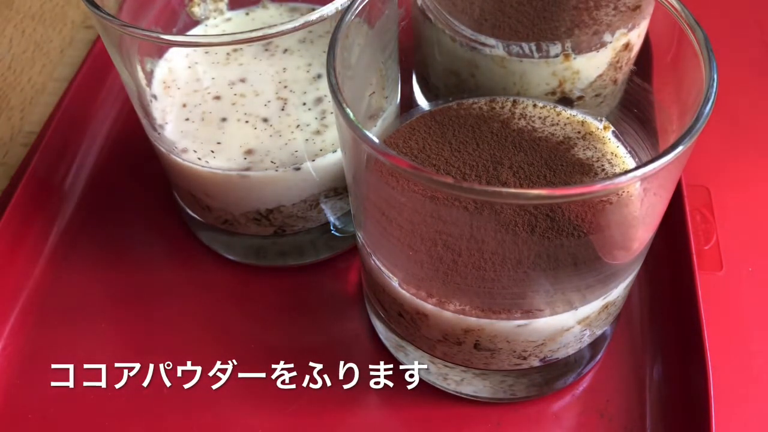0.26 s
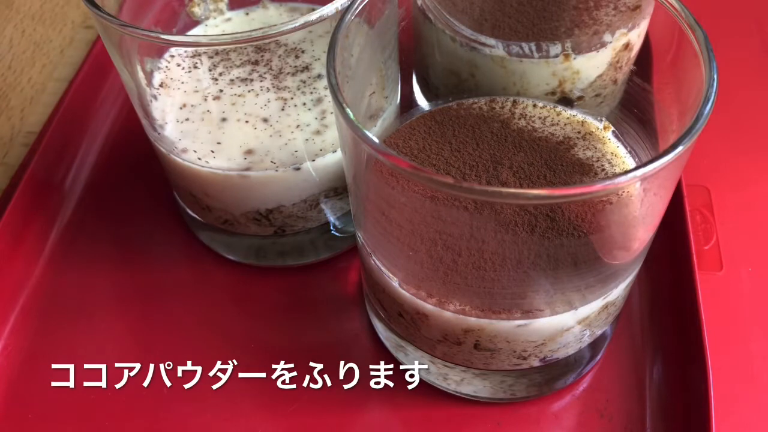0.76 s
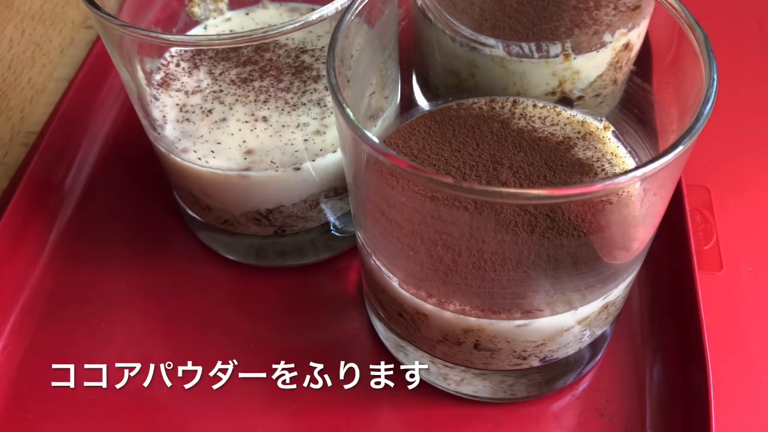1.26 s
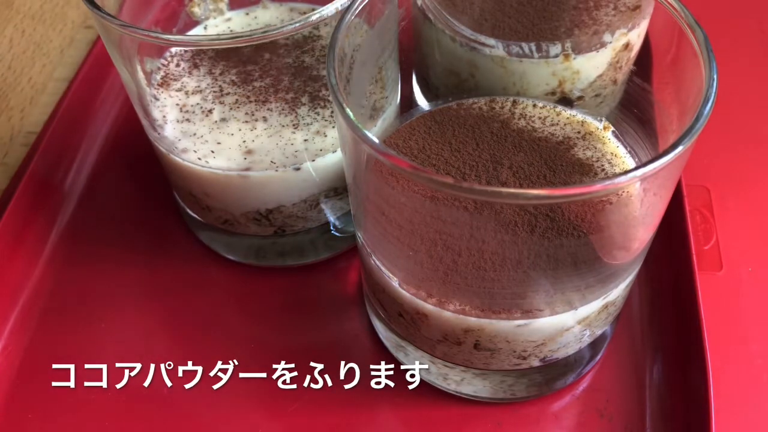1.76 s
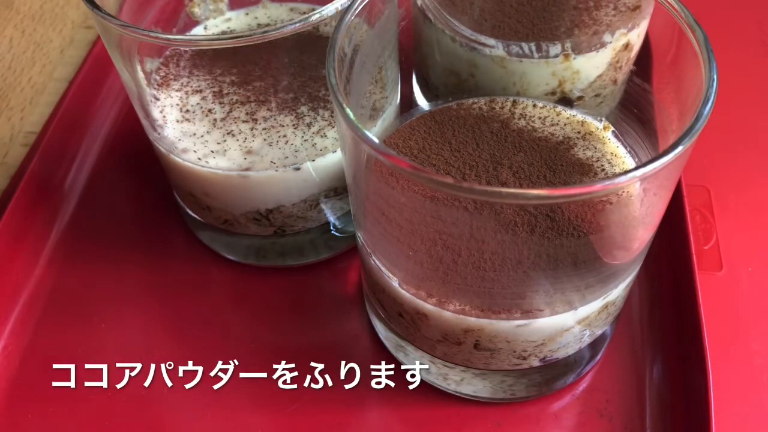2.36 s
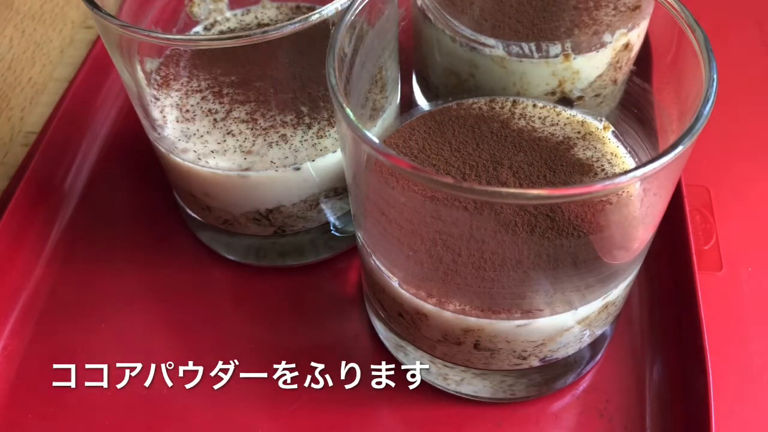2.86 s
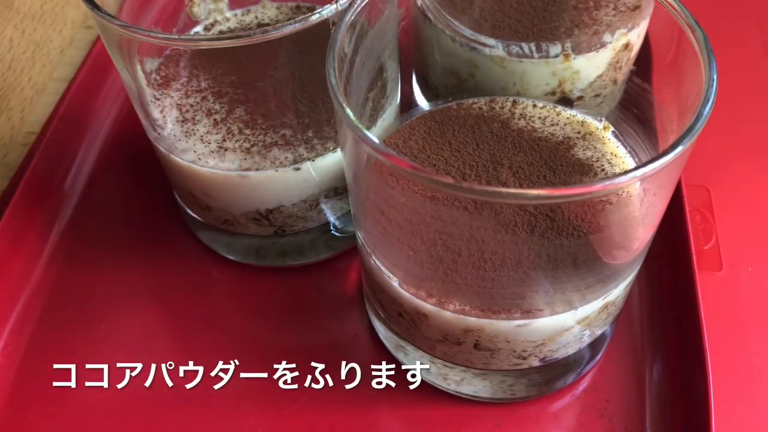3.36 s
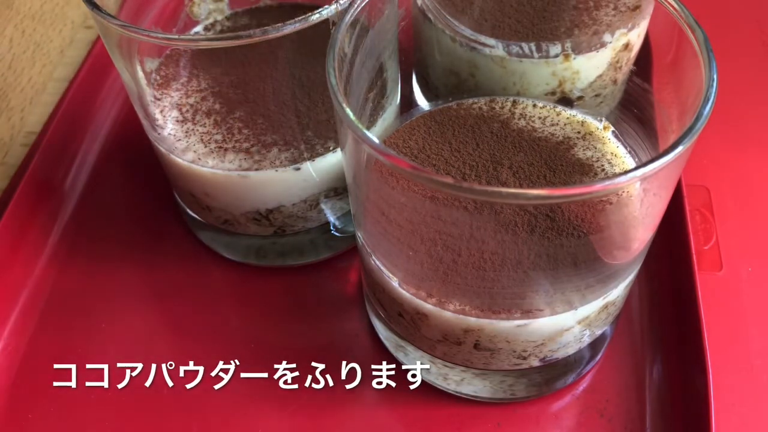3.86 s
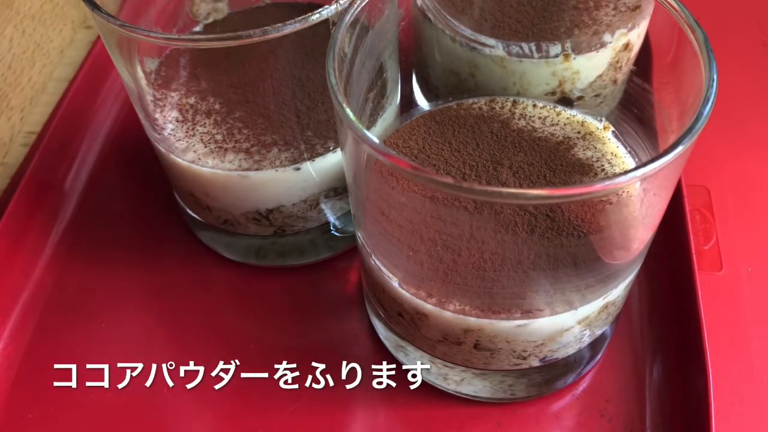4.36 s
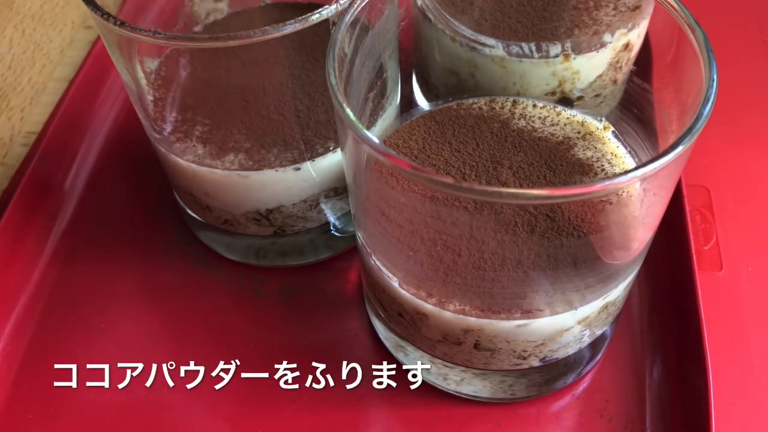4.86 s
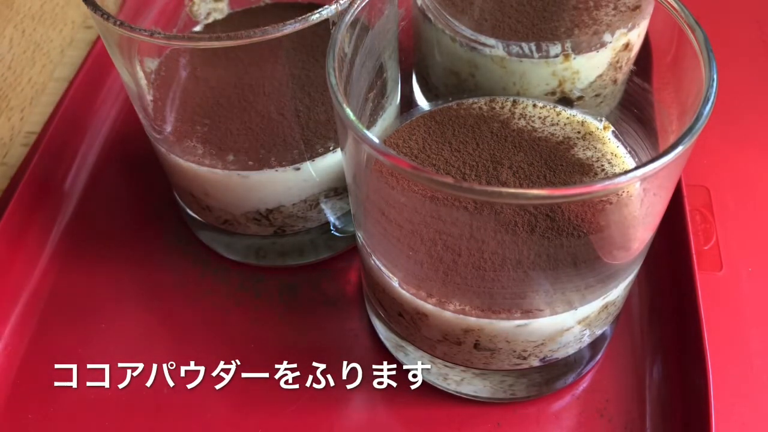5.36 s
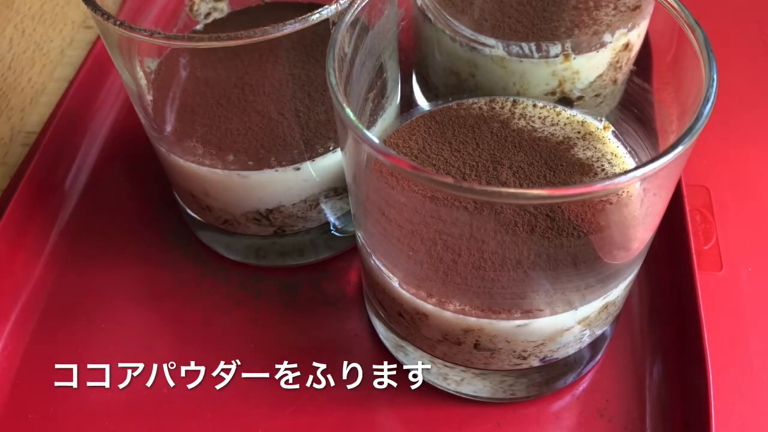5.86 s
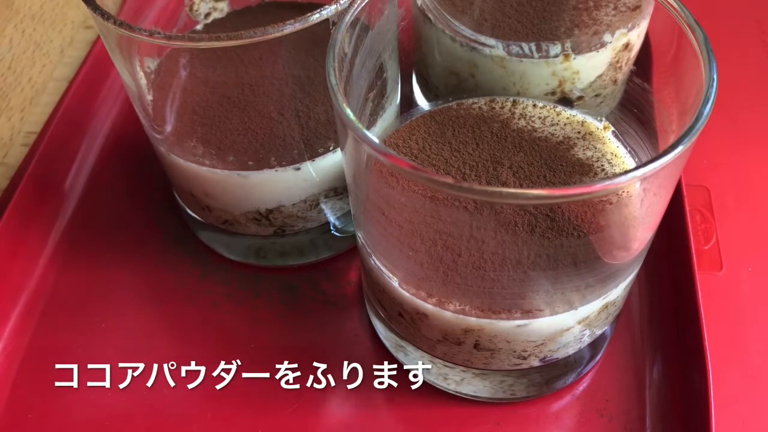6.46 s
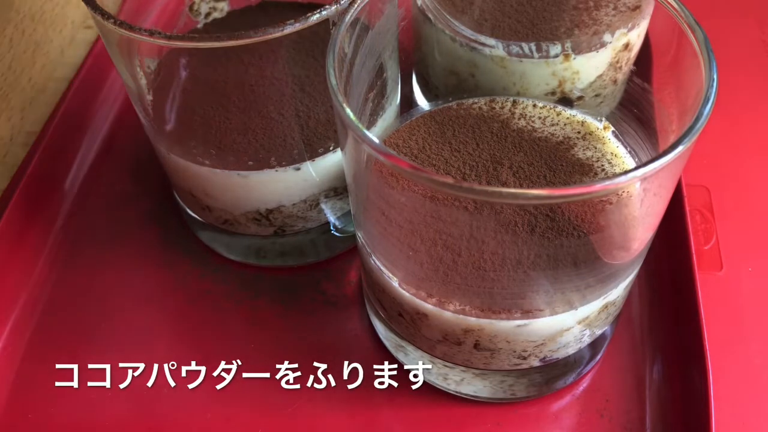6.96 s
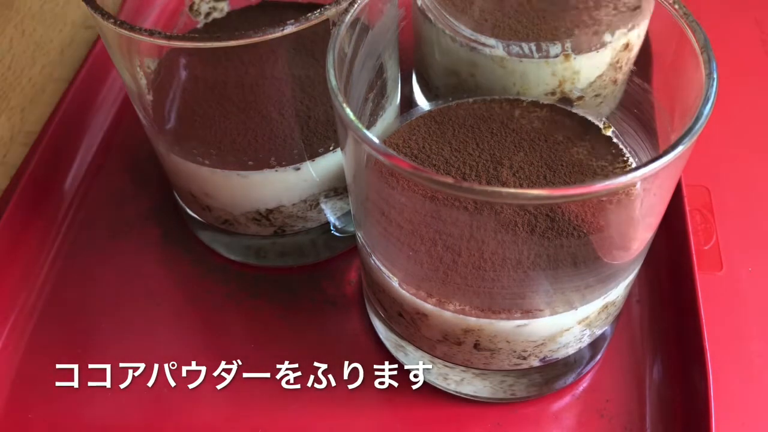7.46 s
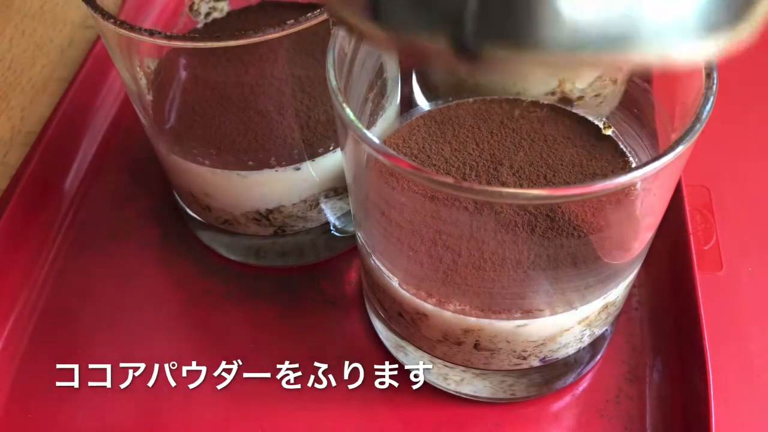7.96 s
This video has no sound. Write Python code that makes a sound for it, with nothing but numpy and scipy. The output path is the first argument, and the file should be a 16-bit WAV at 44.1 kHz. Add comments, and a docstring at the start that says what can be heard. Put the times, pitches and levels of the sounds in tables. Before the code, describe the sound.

A small metal sieve is tapped quickly and evenly, making close, crisp clicks with soft hollow thuds in a quiet kitchen.

```python
"""Quick metallic taps, about five and a half a second: a small sieve dusts cocoa over desserts. Each impact is
a few milliseconds of metal chatter, with a low thud that sinks in pitch, low resonances that swell and die, and
a faint ring of rim and handle; a kitchen answers with a short echo. The sieve ticks lightly between taps, and a
thin tone glides by twice over the murmur of the room's air. The microphone is close, and the hardest taps
overload it softly."""
import sys
import numpy as np
from scipy import signal
from scipy.fft import rfft, irfft, next_fast_len
from scipy.io import wavfile
from scipy.ndimage import uniform_filter1d

SR = 44100
rng = np.random.default_rng(int(sys.argv[2]) if len(sys.argv) > 2 else 0)


def generate_wav(signal):
    """Clip the signal to [-1, 1] and save it as 16-bit WAV at the path in sys.argv[1]."""
    frames = np.transpose(np.atleast_2d(signal))
    scaled = np.clip(frames, -1, 1) * 32767
    pcm = np.round(scaled).astype(np.int16)
    wavfile.write(sys.argv[1], SR, pcm)


N = 362502

# Blows on the sieve. Each row: start in seconds, chatter length in seconds, favoured resonance (the bite) in
# Hz, then relative levels of click, thud and low resonances in dB.
TAPS = [(0.053, 0.0086, 8300, -37, -39.5, -44), (0.222, 0.00067, 9150, -28, -35.5, -35),
        (0.3916, 0.0059, 9900, -22.5, -31, -36), (0.5631, 0.0017, 5670, -21.5, -31.5, -28.5),
        (0.74, 0.0071, 6960, -21.5, -28, -28), (0.9258, 0.005, 6630, -16.5, -27, -30.5),
        (1.105, 0.0056, 6360, -16, -29, -36), (1.286, 0.0073, 6300, -17.5, -29, -28),
        (1.465, 0.0037, 6300, -18, -27.5, -29.5), (1.642, 0.0027, 7140, -11.5, -24.5, -21.5),
        (1.822, 0.0047, 6750, -13.5, -26, -27.5), (2.0041, 0.0027, 9400, -15.5, -24.5, -30),
        (2.1816, 0.0042, 5860, -11, -25.0, -27), (2.3602, 0.0028, 5300, -9, -26, -26.0),
        (2.5457, 0.0068, 5300, -8.0, -25.5, -21.5), (2.7356, 0.0023, 7650, -10.5, -23, -16.5),
        (2.9162, 0.0043, 6900, -10.5, -21.5, -18), (3.0943, 0.0091, 5470, -11.5, -25.5, -26.5),
        (3.2755, 0.014, 9000, -19.0, -29, -25.0), (3.4646, 0.013, 4900, -22.5, -30, -25.5),
        (3.6431, 0.013, 6200, -21.5, -29.5, -24.5), (3.824, 0.016, 3320, -22.5, -34, -26),
        (4.009, 0.0069, 9060, -24.5, -29.5, -26), (4.1937, 0.0062, 5330, -18, -28, -27),
        (4.369, 0.0086, 5400, -18.5, -28.5, -30), (4.5461, 0.0044, 7100, -21, -23.5, -23.5),
        (4.7225, 0.0066, 6370, -18, -26.5, -24.5), (4.9022, 0.0015, 6150, -15, -24, -23),
        (5.0787, 0.0036, 5270, -12, -23, -22.5), (5.2516, 0.0072, 5270, -19, -28.5, -26),
        (5.437, 0.0041, 6000, -22.5, -30.5, -32), (5.6242, 0.0019, 5700, -21.5, -28.5, -31.5),
        (5.808, 0.015, 4900, -20, -31.5, -28.5), (5.9923, 0.008, 4150, -18, -27.5, -33.5),
        (6.175, 0.0036, 3800, -19.0, -28, -32), (6.3524, 0.0069, 2720, -22, -24.5, -48.0),
        (6.53, 0.0057, 3160, -24, -25, -34.5), (6.7415, 0.003, 2860, -34.5, -38.0, -33.5),
        (6.911, 0.016, 3400, -24.0, -31, -27), (7.083, 0.0031, 6040, -21.5, -24.0, -30.5),
        (7.2669, 0.0048, 5740, -18.5, -23, -26), (7.4454, 0.0046, 8650, -23.5, -24.5, -28.5),
        (7.6282, 0.0013, 5900, -21, -24.5, -33.5), (7.802, 0.0059, 6700, -25.0, -27.5, -34.5),
        (7.9786, 0.0023, 5650, -19, -23, -22.5), (8.1482, 0.002, 4800, -21, -26, -30)]
# The clearest ticks between taps. Each row: start in seconds, peak level in dB, centre in Hz.
TICKS = [(4.2394, -31, 4660), (4.6, -39, 5160), (4.78, -34, 3657), (6.4882, -35.5, 4530),
         (6.9394, -32, 5280), (6.984, -30.5, 3250), (7.0403, -30.5, 2580)]
# Chatter bands: knock, clack, click, fizz. Each row: low edge in Hz, high edge in Hz, trim in dB.
REGISTERS = [(380, 1406, -1.5), (1960, 3810, -.5), (4130, 7030, -0.5), (7620, 15300, 0)]
# Low resonances set off by each blow. Each row: frequency in Hz, relative level in dB, t60 and rise in seconds.
LOW_MODES = [(50.5, -19, 0.27, 0.013), (99.8, -9.5, 0.28, 0.034), (169.3, -14, 0.25, 0.019),
             (215.9, 6.5, 0.087, 0.0068), (244, -4.5, 0.27, 0.041), (301.5, 2.5, 0.098, 0.0041),
             (336, -17.5, 0.41, 0.036), (382.2, -8, 0.13, 0.0036), (461, -3.5, 0.062, 0.008),
             (555, -36, 0.041, 0.004)]
# Modes of handle and rim. Each row: frequency in Hz, relative level in dB, t60 in seconds.
HANDLE_MODES = [(1946, 10, .55)]
RIM_MODES = [(3640, 11.5, 0.16), (3650, 8.5, 0.27), (4570, -18, 0.27), (5200, 4, 0.12), (5260, 6, 0.18),
             (6700, -14, .15)]
# The handle's ring comes and goes over several taps. Each row: time in seconds, gain in dB.
HANDLE_GAIN = [(0, -76), (.5, -60), (1.3, -65), (1.7, -56), (2.36, -62), (2.75, -48), (3.09, -55),
               (3.28, -49), (3.6, -64), (4.9, -61), (5.6, -68), (6.17, -54.5), (6.6, -74), (7.3, -58),
               (7.75, -66), (8.0, -52.5)]
# The rim's threshold. In order, all in dB: soft and hard gain re the click, threshold, its width.
RIM_THRESHOLD = (-41, -34.5, -16.5, 0.5)
# How three bands and the echo follow a blow. Each rule: base level in dB, dB per dB of click,
# dB per dB of thud, dB per octave duller, dB per octave brighter, dB per doubling of length.
KNOCK_RULE = (-27.5, 0.0743, 1.0, 3.5, 1.5, 1.2)
CLACK_RULE = (-26.5, 0.43, 0.92, 6, 4.5, 0.7)
FIZZ_RULE = (-22, 0.75, 0.11, -4.5, 5.5, 1.0)
ECHO_RULE = (-47.5, 0.735, 0.14, 2.5, 2.5, .5)
# Spectrum of the kitchen's echo. Each row: frequency in Hz, relative level in dB.
ECHO_COLOUR = [(200, 4), (600, 2), (1200, -1), (2400, -6), (4000, -2.5), (5400, -1), (7500, -3.5),
               (10000, -5.5), (15500, -7)]
# Reverberation time of the kitchen. Each row: frequency in Hz, t60 in seconds.
ECHO_T60 = [(200, 0.63), (1000, 0.31), (3000, 0.42), (5500, 0.37), (9000, 0.29), (16000, 0.26)]
# Glides of the thin tone. Each row: start and length in seconds, first pitch, last pitch and
# height of the arch in Hz, relative level in dB.
GLIDES = [(2.98, 0.16, 2220, 2930, 40, -50), (3.331, .6, 1890, 1947, 250, -51.5)]
# Spectrum of the steady background. Each row: frequency in Hz, relative density in dB.
AIR_SPECTRUM = [(18, -36), (30, -8), (85, 1), (140, 0), (230, 0), (546, -13.5), (639, -13.5), (1260, -13.5),
                (1510, -18), (1970, -19.5), (2240, -23.5), (5450, -24.5), (7460, -25.5), (15500, -30)]

# The ordinary tap, against which harder, heavier, brighter or longer ones are reckoned.
USUAL_CLICK_DB, USUAL_THUD_DB, USUAL_BITE_HZ, USUAL_LENGTH_S = -19, -27, 5700, .005


def sieve():
    """Impact excitation: each blow drives chatter, thud, modes and echo, coloured by how it lands."""
    out = np.zeros(N)
    usual_colour_db = np.array([KNOCK_RULE[0], CLACK_RULE[0], USUAL_CLICK_DB, FIZZ_RULE[0]])
    usual_colour_db -= USUAL_CLICK_DB
    for start, length, bite_hz, click_db, thud_db, low_modes_db in TAPS:
        hard, heavy = click_db - USUAL_CLICK_DB, thud_db - USUAL_THUD_DB
        octaves = np.log2(bite_hz / USUAL_BITE_HZ)
        dull, bright = max(-octaves, 0), max(octaves, 0)
        long = np.log2(length / USUAL_LENGTH_S)
        knock_db, clack_db, fizz_db, echo_db = (
            rule[0] + np.dot(rule[1:], (hard, heavy, dull, bright, long))
            for rule in (KNOCK_RULE, CLACK_RULE, FIZZ_RULE, ECHO_RULE))
        levels_db = np.array([knock_db, clack_db, click_db, fizz_db])
        handle_db = np.interp(start, *np.transpose(HANDLE_GAIN))
        handle_grip_db, rim_grip_db = 3 * rng.standard_normal(2)  # the hand's grip varies
        lead_s = .0033
        add(out, start - lead_s, graze(lead_s))
        add(out, start - .0003, chatter(length, bite_hz, levels_db + .5))
        add(out, start, amp(echo_db) * kitchen(levels_db - click_db - usual_colour_db, bite_hz))
        add(out, start, amp(thud_db + 3.5) * thud())
        add(out, start, amp(low_modes_db + 4) * low_modes())
        add(out, start, amp(handle_db + handle_grip_db) * ring(HANDLE_MODES))
        add(out, start, amp(rim_gain_db(click_db) + rim_grip_db) * ring(RIM_MODES))
    return out


def chatter(length, bite_hz, levels_db, bite_width_hz=600, spiky_db=4.3, rise_s=.00019, decay_s=.002):
    """Contact noise: metal rattles on metal in a dense, uneven run that dies within milliseconds."""
    t = seconds(.04)
    hold_s = length * .58
    envelope = np.minimum(t / rise_s, 1) * np.exp(-np.maximum(t - hold_s, 0) / decay_s)
    scatter = amp(-21) * np.exp(-t / .011) * (t > hold_s)  # returned by the tray and glasses
    contacts = np.interp(t, np.linspace(0, t[-1], num=80), rng.standard_normal(80))
    force = rng.standard_normal(len(t)) * (envelope + scatter) * amp(spiky_db * contacts)
    # The spot that is struck favours one broad resonance of the frame.
    resonance = signal.iirpeak(bite_hz, bite_hz / bite_width_hz, fs=SR)
    force += amp(6) * signal.lfilter(*resonance, force)
    out = np.zeros(len(t))
    for (low_hz, high_hz, trim_db), db in zip(REGISTERS, levels_db):
        part = band(force, low_hz, high_hz)
        out += amp(db + trim_db) * part / np.linalg.norm(part)
    return out * np.sqrt(.005 * SR)  # unit energy becomes unit rms over five milliseconds


def graze(length):
    """Light contact: a faint hiss grows just before the blow seats."""
    t = seconds(length)
    noise = rng.standard_normal(SR // 100)[:len(t)]
    hiss = band(noise * np.sqrt(t / length), 2000, 15000)
    return amp(-45 + 4 * rng.standard_normal()) * unit_rms(hiss)


def thud(start_hz=632, rest_hz=74, halving_s=.003226, attack_s=.003, hold_s=.03, release_db_per_s=2400):
    """Dispersion: the higher parts of the blow's low push arrive first, so the pitch sinks."""
    t = seconds(.05)
    detune = 1 + .059 * rng.standard_normal()
    hz = np.maximum(start_hz / (1 + t / halving_s), rest_hz) * detune
    attack = np.minimum(t / attack_s, 1) ** 4
    release = amp(-release_db_per_s * np.maximum(t - hold_s, 0))
    return attack * release * np.sin(2 * np.pi * np.cumsum(hz) / SR)


def low_modes(detune=.016, uneven_db=2):
    """Resonance: low modes swell and die, a little differently at each blow."""
    draws = rng.standard_normal((len(LOW_MODES), 2))
    return sum(mode(hz * (1 + detune * sharp), db + uneven_db * loud, t60, rise, width_hz=12, blur_s=.097)
               for (hz, db, t60, rise), (sharp, loud) in zip(LOW_MODES, draws))


def ring(modes):
    """Damped free vibration: thin metal, held in the hand, rings at its natural frequencies."""
    return sum(mode(hz, db + uneven_db, t60, rise_s=.0011, width_hz=24, blur_s=.08)
               for (hz, db, t60), uneven_db in zip(modes, rng.standard_normal(len(modes))))


def rim_gain_db(click_db):
    """Threshold response: the rim barely sounds until the click is strong enough, then rings out."""
    soft_db, hard_db, threshold_db, width_db = RIM_THRESHOLD
    return click_db + soft_db + (hard_db - soft_db) / (1 + np.exp((threshold_db - click_db) / width_db))


def mode(hz, db, t60, rise_s, width_hz, blur_s):
    """Interference: a decaying tone starts clean, then reflections make its level and phase uneven."""
    t, slow = seconds(.25), np.linspace(0, .25, num=250)
    onset = 1 - np.exp(-(slow / rise_s) ** 2)
    fade = np.minimum((slow[-1] - slow) / .05, 1)
    level = amp(db - 60 * slow / t60) * onset * fade
    direct = np.exp(-slow / blur_s)
    reflected = np.sqrt(1 - direct ** 2) * wander(slow, width_hz)
    envelope = level * (direct + reflected)
    phase = 2 * np.pi * hz * t + np.interp(t, slow, np.unwrap(np.angle(envelope)))
    return np.interp(t, slow, abs(envelope)) * np.sin(phase)


def ticks(decay_s=.0029):
    """Small impacts: the sieve shifts in the hand, giving short noise bursts with a faint echo."""
    out, t = np.zeros(N), seconds(.02)
    for start, db, hz in list(TICKS) + list(rebounds()):
        burst = rng.standard_normal(len(t)) * np.exp(-t / decay_s)
        tick = band(burst, hz * .54, hz * 1.77)
        add(out, start, amp(db) * tick / abs(tick).max())
        add(out, start, amp(db - 36) * kitchen(np.zeros(len(REGISTERS)), hz))
    return out


def rebounds(chance=.22, earliest_s=.055, latest_s=.11, level_db=-41, centre_hz=5600):
    """Rebound: after some taps the sieve lifts and ticks faintly. Yields rows like those of TICKS."""
    uniform, normal = rng.random((len(TAPS), 2)), rng.standard_normal((len(TAPS), 2))
    for (start, *_), (luck, when), (loud, sharp) in zip(TAPS, uniform, normal):
        if luck < chance:
            delay = earliest_s + (latest_s - earliest_s) * when
            yield start + delay, level_db + 3 * loud, centre_hz * 2 ** (.3 * sharp)


def kitchen(tap_colour_db, bite_hz, follow=.37, bite_db=3, bite_octaves=.2, build_s=.00031):
    """Diffuse reverberation: the echo takes on part of the tap's colour, and its bass lasts longest."""
    hz, t, spectrum = signal.stft(rng.standard_normal(SR // 3), SR, nperseg=256)
    centres = [np.sqrt(low * high) for low, high, _ in REGISTERS]
    tap_db = curve_at(list(zip(centres, tap_colour_db)), hz)
    # Each blow favours other partials.
    partials = unit_rms(uniform_filter1d(rng.standard_normal(len(hz)), size=3))
    bite = np.exp(-(np.log2((hz + 1) / bite_hz) / bite_octaves) ** 2)
    colour_db = curve_at(ECHO_COLOUR, hz) + follow * tap_db + 2.18 * partials + bite_db * bite
    decay_db = 60 * t / curve_at(ECHO_T60, hz)[:, None]
    _, tail = signal.istft(spectrum * amp(colour_db[:, None] - decay_db), SR, nperseg=256)
    onset = 1 - np.exp(-(np.arange(len(tail)) / SR / build_s) ** 2)
    return amp(15) * tail * onset


def thin_tone(width_hz=120):
    """Narrow-band noise: a faint, fuzzy tone swells and fades as its pitch follows an arched glide."""
    out = np.zeros(N)
    for start, length, first_hz, last_hz, arch_hz, db in GLIDES:
        t = seconds(length)
        arch = np.sin(np.pi * t / length)
        hz = first_hz + (last_hz - first_hz) * t / length + arch_hz * arch
        tone = (wander(t, width_hz) * np.exp(2j * np.pi * np.cumsum(hz) / SR)).real
        add(out, start, amp(db - 3) * arch * unit_rms(tone))
    return out


def room_air(level_db=-47.5):
    """Stationary coloured noise: the low murmur of the room's air and a soft hiss."""
    size = next_fast_len(N, real=True)
    colour = amp(curve_at(AIR_SPECTRUM, np.fft.rfftfreq(size, 1 / SR)))
    murmur = irfft(rfft(rng.standard_normal(size)) * colour, size)[:N]
    return amp(level_db) * unit_rms(murmur)


def wander(t, width_hz):
    """Random modulation: slow complex noise that varies the level and phase of a tone."""
    knots = rng.standard_normal((400, 2)) @ [1, 1j]
    return np.interp(t * 2 * width_hz, np.arange(len(knots)), knots) * np.sqrt(3 / 4)


def band(x, low_hz, high_hz):
    """Causal band-pass filtering."""
    edges = np.clip([low_hz, high_hz], 20, SR / 2 - 500)
    return signal.sosfilt(signal.butter(3, edges, "band", fs=SR, output="sos"), x)


def curve_at(points, hz):
    """Interpolation on a logarithmic frequency axis."""
    knots_hz, values = np.transpose(points)
    return np.interp(np.log(hz + 1), np.log(knots_hz + 1), values)


def amp(db):
    """Decibels as an amplitude ratio."""
    return 10 ** (np.asarray(db) / 20)


def unit_rms(x):
    """Normalisation to unit power."""
    return x / np.sqrt(np.mean(x ** 2) + 1e-20)


def seconds(length):
    """Uniform sampling of a span of time."""
    return np.arange(int(length * SR)) / SR


def add(mix, start_s, sound):
    """Superposition of a delayed sound on the mix."""
    part = mix[max(round(start_s * SR), 0):][:len(sound)]
    part += sound[:len(part)]


def scene():
    """Superposition: the sieve and the quiet kitchen sum in one channel."""
    return (sieve() + ticks() + thin_tone() + room_air())[None]


def record(dry, low_cut_hz=38, high_cut_hz=15850):
    """Saturation and band limits: the microphone rounds hard peaks and loses deep bass and top treble."""
    size = next_fast_len(N + SR // 4, real=True)
    hz = np.fft.rfftfreq(size, 1 / SR)
    high_pass = hz ** 4 / np.sqrt(hz ** 8 + low_cut_hz ** 8)
    thinned = irfft(rfft(dry, size) * high_pass, size)[:, :N]
    saturated = thinned / (1 + thinned ** 4) ** (1 / 4)
    low_pass = signal.firwin(401, high_cut_hz, window=("kaiser", 7), fs=SR)
    return signal.oaconvolve(saturated, low_pass[None], "same")


dry = scene()
out = record(dry)
generate_wav(out)
```